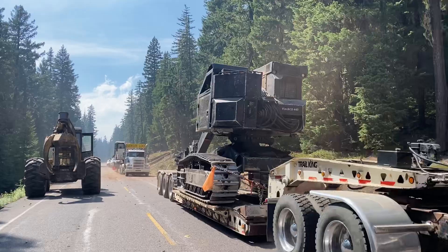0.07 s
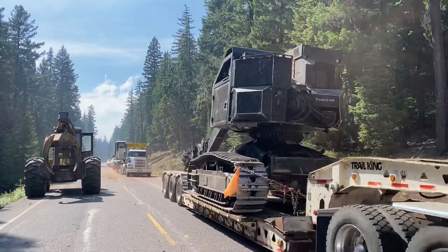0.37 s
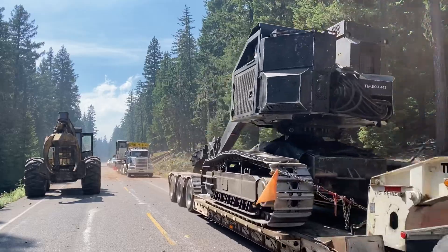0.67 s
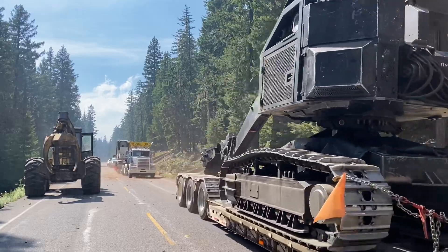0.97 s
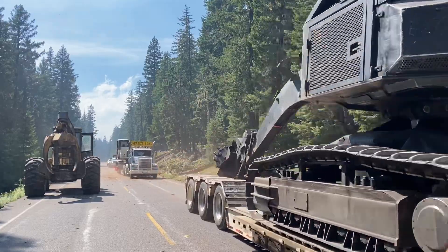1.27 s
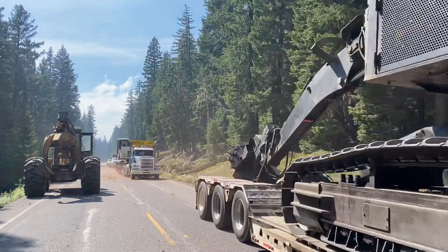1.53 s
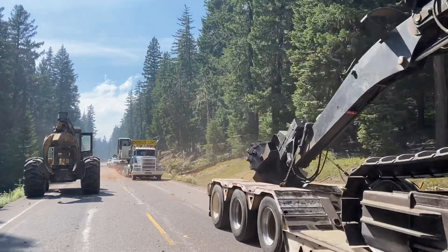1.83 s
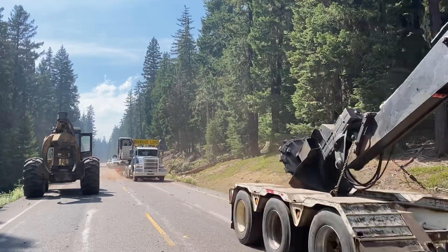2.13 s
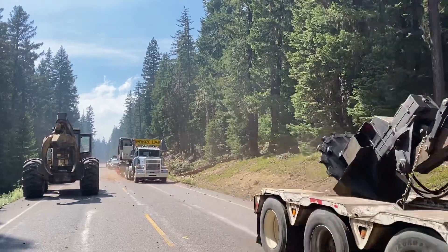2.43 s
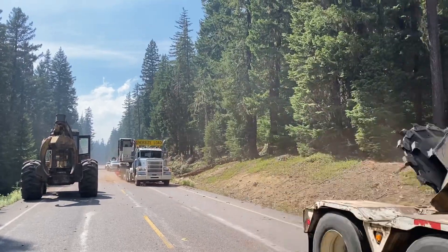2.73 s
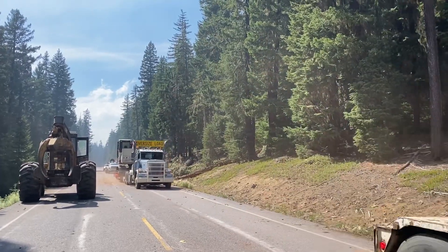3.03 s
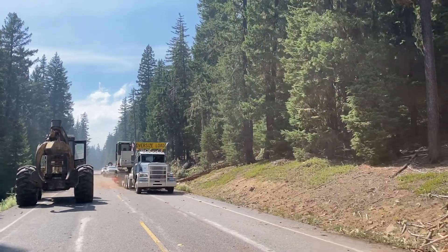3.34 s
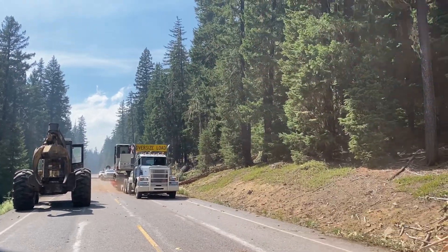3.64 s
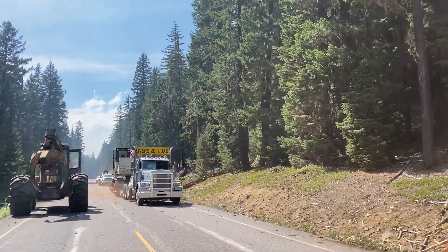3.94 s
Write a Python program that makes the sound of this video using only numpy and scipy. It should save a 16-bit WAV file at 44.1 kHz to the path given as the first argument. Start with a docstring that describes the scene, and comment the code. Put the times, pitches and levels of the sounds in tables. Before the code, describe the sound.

A heavy truck passes on the right of a forest road, its roar fading as the trailer's tyres rumble and hiss by with metal clanks. A diesel idles near the microphone, and an oncoming machine's drone grows.

```python
"""A heavy truck hauls a long low trailer past on the right of a forest road.
Its exhaust tones and engine roar fade, then the trailer's tyres rumble and hiss by, flicking grit,
with clanks and a sinking metallic sizzle. A six-cylinder diesel idles close by, each firing a knock
that swells as it comes back off the passing load. The exhaust drone of an oncoming machine grows."""
import sys
import numpy as np
from scipy import signal
from scipy.fft import rfft, irfft, next_fast_len
from scipy.io import wavfile
from scipy.ndimage import map_coordinates

SR = 44100
rng = np.random.default_rng(int(sys.argv[2]) if len(sys.argv) > 2 else 0)


def bounce(signal):
    """Save signal as a 16-bit WAV file at the path given by the first command-line argument."""
    frames = np.transpose(np.atleast_2d(signal))
    limited = np.clip(frames, -1, 1)
    pcm = np.round(limited * 32767).astype(np.int16)
    wavfile.write(sys.argv[1], SR, pcm)


N = 176400


def amp(db):
    """Turn decibels into a gain."""
    return 10 ** (np.asarray(db) / 20)


def along(points, hz):
    """Read a table between its points, on a log frequency axis."""
    freqs, values = np.transpose(points)
    return np.interp(np.log(hz + 1), np.log(freqs + 1), values)


def curves(rows):
    """One value per sample for each column after the time."""
    times, *columns = np.transpose(rows)
    return [np.interp(np.arange(N) / SR, times, column) for column in columns]


def wobble(rate):
    """A smooth curve through `rate` random values a second."""
    return map_coordinates(rng.standard_normal(1000), [np.arange(N) * rate / SR], mode="mirror")


def filtered(x, response):
    """Scale each frequency in x by response(hz)."""
    size = next_fast_len(N + SR // 4)
    return irfft(rfft(x, size) * response(np.fft.rfftfreq(size, 1 / SR)), size)[..., :N]


# Sound from the right reaches the right side first (frequency [Hz], left lead [rad])
TRUCK_PHASE = [(330, 0), (750, -1.6), (950, -1.6), (1600, -3.1), (2000, -4.2), (2550, -6.3), (3700, -9.4),
               (4500, -12.3), (5700, -15.7), (8000, -21), (11000, -25.1)]
def from_truck(hz):
    """How far the left side leads for a source on the right."""
    return along(TRUCK_PHASE, hz)


# Sound from close by (frequency [Hz], left lead [rad])
NEARBY_PHASE = [(80, 1.5), (420, -0.68), (740, -1.7), (900, -1), (1300, -1.5), (2000, -0.54), (3500, -1.6),
                (4200, 0), (6500, -3), (11000, -13)]
def from_nearby(hz):
    """How far the left side leads for a source near the idling engine."""
    return along(NEARBY_PHASE, hz)


# Stereo balance at lean=1 (frequency [Hz], left minus right [dB])
BALANCE = [(80, -0.5), (300, 1.8), (600, 5), (790, 3), (950, 0.5), (1500, 4.5), (2100, 5), (3300, 3.5),
           (4600, 0.5), (6300, -6.5), (8000, -1.5), (11000, 0)]
def stereo(hz, phase, lean):
    """Left and right gains of mean power 1; more lean makes them more unequal."""
    left = amp(lean * along(BALANCE, hz) / 2) * np.exp(.5j * phase(hz))
    return np.array([left, 1 / left]) / np.sqrt((abs(left) ** 2 + abs(left) ** -2) / 2)


def rush(spectrum, alike, phase, lean, ripple_db=0, spacing_hz=64.9):
    """Shaped stereo noise, rippled by the closely spaced resonances of engine and bodywork."""
    size = next_fast_len(N)
    hz = np.fft.rfftfreq(size, 1 / SR)
    ripple = map_coordinates(rng.standard_normal(1000), [hz / spacing_hz], mode="mirror")
    ripple *= np.minimum(hz / 1000, 1)
    gain = amp(along(spectrum, hz) + ripple_db * ripple) * np.sqrt(SR / 2)
    mid, side = rfft(rng.standard_normal((2, size))) * gain
    width = np.arccos(np.clip(along(alike, hz), 0, 1)) / 2
    mid, side = mid * np.cos(width), side * np.sin(width)
    return irfft(np.array([mid + side, mid - side]) * stereo(hz, phase, lean), size)[:, :N]


def exhaust(pitch, levels_db, flutter_db):
    """Exhaust tones on multiples of the firing rate; the higher ones flutter more."""
    angle = 2 * np.pi * np.cumsum(pitch) / SR
    tones = np.zeros(N)
    for k, db in enumerate(levels_db, 1):
        gain = amp(db + k * flutter_db * wobble(22.03))
        tones += gain * np.sin(k * angle + rng.uniform(0, 2 * np.pi))
    return np.sqrt(2) * tones * amp([[.3], [-.3]])  # a touch louder on the left


# The growing drone (time [s], pitch [Hz], level [dB])
DRONE = [(1.4, 79.87, -32), (2, 79.8, -28.5), (2.6, 80.1, -21.5), (2.9, 81, -24.5), (3.3, 81.6, -20),
         (3.6, 81.63, -17.5), (4, 82.26, -19)]
# Its 2nd to 4th tones (level against the 1st [dB])
OVERTONES = [-12.5, -24.5, -28]
# Tone of the thin hiss (frequency [Hz], level [dB])
HISS_TONE = [(5000, -120), (8200, -93), (10300, -91.5), (13200, -94), (15400, -99)]
# Its swell (time [s], level [dB])
HISS_LEVEL = [(0, -28), (1.6, -15), (2.3, -6.5), (3, -1.5), (3.5, -0.5), (4, -1.5)]
def oncoming_machine():
    """A deep exhaust drone grows, along with a thin high hiss."""
    pitch, db = curves(DRONE)
    hiss_db, = curves(HISS_LEVEL)
    drone = exhaust(pitch, [db] + [db + over for over in OVERTONES], flutter_db=0.5)
    hiss_gain = amp(hiss_db + 0.64 * wobble(23))
    return drone + hiss_gain * rush(HISS_TONE, [(7000, .4), (11000, 0.11)], from_nearby, lean=1)


IDLE_FIRING_HZ = 45.5
def firings(cylinder_db, place, rise_s, decay_s, scatter_db):
    """A gain of mean power 1 that jumps and dies away as each cylinder fires in turn."""
    k = np.arange(int(N / SR * IDLE_FIRING_HZ) - 1)
    starts = np.round((k + place) / IDLE_FIRING_HZ * SR).astype(int)
    strength = amp(np.resize(cylinder_db, len(k)) + scatter_db * rng.standard_normal(len(k)))
    t = np.arange(SR // 10) / SR
    pulse = np.exp(-t / decay_s) * (1 - np.exp(-(t / rise_s) ** 2))
    power = abs(signal.fftconvolve(np.bincount(starts, strength ** 2, N), pulse ** 2)[:N])
    return np.sqrt(power / power.mean())


# Tone of the steady noise, block knock, cover ring and injector tick (frequency [Hz], level [dB])
IDLE_TONE = [(20, -76), (60, -44), (125, -44), (215, -52.5), (325, -52.5), (450, -59.5), (620, -58),
             (750, -61.5), (1000, -68), (1550, -67.5), (1950, -70), (2400, -73.5), (3300, -77),
             (3900, -73.5), (4600, -86), (5300, -84), (5800, -84.5), (7500, -97), (15000, -122)]
KNOCK = [(100, -120), (400, -71), (580, -64), (700, -71), (850, -57), (1100, -67.5), (1400, -71),
         (4000, -120)]
RING = [(500, -140), (1400, -93), (1760, -76.5), (1880, -58.5), (2060, -62.5), (2200, -73.5), (2450, -78),
        (3000, -95), (6000, -150)]
TICK = [(1000, -125), (2600, -76), (3900, -75), (4650, -81.5), (5450, -80), (5700, -79.5), (7400, -94),
        (14000, -125)]
# Swell of the steady noise (time [s], level [dB])
IDLE_LEVEL = [(0, -9), (1.5, -3.5), (2.5, -0.5), (3.1, 1), (4, 1.5)]
# How the clatter comes and goes (time [s], knock [dB], ring [dB], tick [dB])
CLATTER_LEVEL = [(0, -1, -5, 4.5), (1.2, -7, -11, -28), (1.68, -4, -5.5, -7), (1.84, -0.5, 3, -0.5),
                 (2.25, -0.5, 0, -6.5), (2.55, -4.5, -5.5, -2), (2.9, -12, -3, -5.5), (4, -6, -3, -8)]
# Strength of each cylinder (knock [dB], ring [dB], tick [dB])
CYLINDERS = [(2.5, 5, 20.5), (1.5, -6.5, 15), (-23, 0.5, 9.5), (-0.5, 3, -2), (-2.5, 1.5, 14), (0, -6, 11)]
# Timing of knock, ring and tick (place between firings [0-1], rise [s], decay [s])
STROKES = [(0.61, 0.003, 0.0061), (0.06, 0.004, 0.04), (0.7, 0.005, 0.0099)]
# How alike left and right are (frequency [Hz], likeness [0-1])
IDLE_ALIKE = [(80, 1), (300, 0.93), (520, 0.45), (800, 1), (1400, 0.72), (2000, 0.78), (3000, 0.26),
              (4000, 0.5), (6300, 0.14), (9000, 0.41)]
def idling_diesel():
    """Over steady engine noise, each firing knocks the block, rings a cover and ticks the injectors."""
    level, = curves(IDLE_LEVEL)
    gain = amp(level + .6 * wobble(22))
    out = gain * rush(IDLE_TONE, IDLE_ALIKE, from_nearby, lean=0.88, ripple_db=1.4)
    parts = zip((KNOCK, RING, TICK), np.transpose(CYLINDERS), STROKES, curves(CLATTER_LEVEL))
    for tone, pattern, timing, db in parts:
        pulses = amp(db) * firings(pattern, *timing, scatter_db=1.2)
        out += pulses * rush(tone, IDLE_ALIKE, from_nearby, lean=1.35, ripple_db=1.6)
    return out


# Tone of the diesel's low beat (frequency [Hz], level [dB])
THUMP = [(45, -85), (75, -37.5), (110, -45), (185, -34.5), (400, -87), (900, -150)]
def diesel_thump(loudest_s=1.348, spread_s=.45, sharpness=2.4):
    """The diesel beats low once per round of its six cylinders, loudest with the load alongside."""
    t = np.arange(N) / SR - loudest_s
    beat = np.exp(sharpness * (np.cos(2 * np.pi * t * IDLE_FIRING_HZ / len(CYLINDERS)) - 1))
    swell = np.exp(-.5 * (t / spread_s) ** 2)
    return beat * swell * rush(THUMP, TYRE_ALIKE, np.zeros_like, lean=1)


# The sharpest snaps (time [s], level [dB])
SNAPS = [(0.095, -35), (2.121, -36), (2.201, -31.5), (2.685, -41)]
# Their bright tone (frequency [Hz], gain [dB])
GRIT_TONE = [(4000, -33), (7400, -14), (8300, 0), (12200, -2), (14000, -19)]
def grit(fine_count=30, fine_db=-55, decay_s=0.003):
    """Small stones snap under the tyres: a few sharp ticks among fine ones."""
    fine = [(rng.uniform(0, N / SR), fine_db + 3 * rng.standard_normal()) for _ in range(fine_count)]
    out, t = np.zeros(N + SR), np.arange(SR // 20) / SR
    for start, db in SNAPS + fine:
        out[int(start * SR):][:len(t)] += amp(db) * np.exp(-t / decay_s) * rng.standard_normal(len(t))
    return filtered(out[:N], lambda hz: amp(along(GRIT_TONE, hz)))


# Single hits of metal (time [s], low knock [dB], high ring [dB])
CLANKS = [(1.575, 7.5, -26), (1.733, 9.5, -6), (1.776, -1, 8), (1.841, 6, 10), (1.974, 9.5, 12),
          (2.016, 7, 4), (2.171, -1, 9), (2.247, 6, 8), (2.278, 15, -10), (2.379, 2, 7), (3.037, -16, 4),
          (3.434, -16, 2)]
def clanks(rise_s=0.0021, decay_s=0.012):
    """Hard knocks with the diesel's knock and ring tones, loudest as the load goes by."""
    out = np.zeros((2, N))
    starts, knock_db, ring_db = np.transpose(CLANKS)
    for tone, levels in (KNOCK, knock_db), (RING, ring_db):
        hits = np.zeros(N)
        for start, db in zip(starts, levels):
            t = np.maximum(np.arange(N) / SR - start, 0)
            hits += amp(db) * np.exp(-t / decay_s) * (1 - np.exp(-t / rise_s))
        out += amp(4.0) * hits * rush(tone, IDLE_ALIKE, from_nearby, lean=2.2)
    return out


# The sinking sizzle (time [s], pitch [Hz], level [dB])
SIZZLE = [(1.6, 4480, -56), (2.0, 4300, -45.5), (2.7, 3950, -43.5), (3.25, 3815, -45.5), (4, 3792, -42.5)]
def sizzle(half_width_hz=370):
    """A narrow band of metallic hiss flickers and sinks in pitch as the rear axles go by."""
    pitch, db = curves(SIZZLE)
    a, b = filtered(rng.standard_normal((2, 2, N)), lambda hz: np.exp(-(hz / half_width_hz) ** 2))
    angle = 2 * np.pi * np.cumsum(pitch) / SR
    band = a * np.cos(angle) + b * np.sin(angle)  # lifts the low noise up to the pitch
    return amp(db + 2 * wobble(25)) * band / band.std()


# The tyres passing (time [s], rumble [dB], hiss [dB])
TYRE_LEVEL = [(0, -3.5, -8), (.8, -0.5, -2.5), (1.4, -5.5, -4), (1.75, -1, -3.5), (1.92, -2.5, -2.5),
              (2.4, -3.5, -3), (2.65, -8, -5), (2.9, -6, -4.5), (4, -13, -25)]
# Tone of their rumble and hiss (frequency [Hz], level [dB])
TYRE_RUMBLE = [(20, -66), (45, -49), (75, -36.5), (110, -51), (190, -44.5), (320, -47.5), (450, -54),
               (700, -71), (2500, -130)]
TYRE_HISS = [(300, -77), (590, -57.5), (700, -62.5), (950, -60.5), (1600, -65.5), (2900, -93),
             (4700, -88.5), (6000, -82.5), (7000, -88.5), (10000, -101), (15000, -126)]
# How alike left and right are (frequency [Hz], likeness [0-1])
TYRE_ALIKE = [(80, 1), (300, 0.85), (500, 1), (900, 0.14), (2500, 0.13), (8000, 0.16)]
def trailer_tyres():
    """Tyres rumble unevenly under the load and hiss as the rear axles pass."""
    rumble_db, hiss_db = curves(TYRE_LEVEL)
    rumble = amp(rumble_db + wobble(24.95)) * rush(TYRE_RUMBLE, TYRE_ALIKE, np.zeros_like, lean=0.71)
    hiss_gain = amp(hiss_db + 1.1 * wobble(30))
    return rumble + hiss_gain * rush(TYRE_HISS, TYRE_ALIKE, from_nearby, lean=1.74, ripple_db=1.6)


# The truck's firing rate as heard, sinking a little as it pulls away (time [s], firing rate [Hz])
TRUCK_FIRING = [(0, 46.16), (.3, 45.85), (1.1, 45.63), (4, 45.58)]
# Its four exhaust tones (time [s], 1st [dB], 2nd [dB], 3rd [dB], 4th [dB])
EXHAUST_LEVELS = [(0, -14, -31.5, -16.5, -53), (.3, -18, -18, -15.5, -39), (.65, -17.5, -27, -16.5, -22.5),
                  (1.1, -26, -24.5, -21, -22.5), (1.5, -28, -33.5, -28.5, -26), (2, -31, -37, -31, -39),
                  (4, -27, -33, -34.5, -43)]
# Fade of the roar and whine (time [s], level [dB])
ENGINE_LEVEL = [(0, 1), (.4, -0.5), (.65, -3), (1, -7), (1.5, -13.5), (2.2, -13.5), (3, -25), (4, -43)]
# Tone of the roar (frequency [Hz], level [dB])
ROAR = [(20, -31), (45, -59), (110, -37.5), (190, -44.5), (270, -41), (345, -49), (560, -47), (720, -53),
        (820, -44.5), (980, -49), (1300, -57.5), (1900, -56.5), (2350, -66), (3000, -63), (3600, -64.5),
        (3950, -73.5), (4450, -70), (5350, -82.5), (6050, -75), (7500, -86.5), (10500, -87.5),
        (15000, -106)]
# How alike left and right are (frequency [Hz], likeness [0-1])
ROAR_ALIKE = [(100, 0.49), (300, 1), (470, 0.26), (750, 1), (3000, 0.82), (6300, 0.15), (11000, 0.75)]
# Block and gear tones (pitch [times the firing rate], level [dB])
WHINE = [(7.5, -30), (12, -34), (18.5, -33), (26.5, -38)]
def truck():
    """Exhaust tones, gear whine and a roar that throbs with the firing fade as the truck pulls away."""
    pitch, = curves(TRUCK_FIRING)
    level, = curves(ENGINE_LEVEL)
    angle = 2 * np.pi * np.cumsum(pitch) / SR
    throb_db = .8 * np.sin(angle) + .8 * wobble(16)
    roar = amp(throb_db) * rush(ROAR, ROAR_ALIKE, from_truck, lean=0.67, ripple_db=2.94)
    whine = sum(amp(db + 1.1 * wobble(10)) * np.sin(k * angle + 0.82 * wobble(24.56)) for k, db in WHINE)
    whine = filtered(whine, lambda hz: stereo(hz, from_truck, lean=0.19))
    return amp(level) * (roar + whine) + exhaust(pitch, curves(EXHAUST_LEVELS), flutter_db=0.4)


def scene():
    """Add up all the machines on the road."""
    passing = truck() + trailer_tyres() + sizzle()
    return passing + idling_diesel() + diesel_thump() + clanks() + oncoming_machine() + grit()


def record(dry, ceiling=.96, top_hz=15700):
    """Round off the highest peaks and cut the very top of the treble."""
    soft = dry / (1 + abs(dry / ceiling) ** 8) ** (1 / 8)
    return filtered(soft, lambda hz: hz < top_hz)


dry = scene()
out = record(dry)
bounce(out)
```